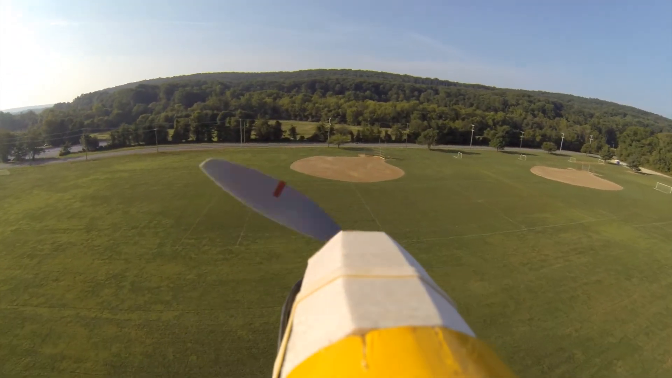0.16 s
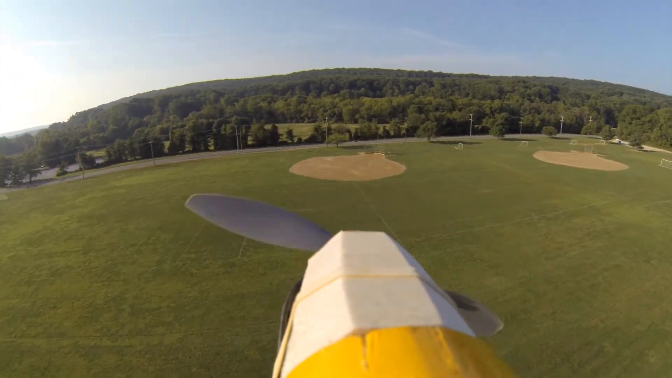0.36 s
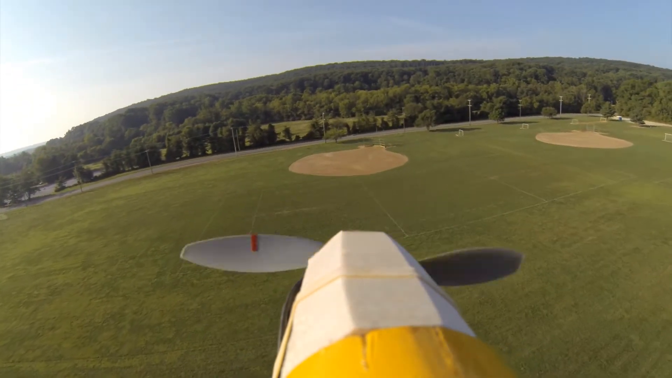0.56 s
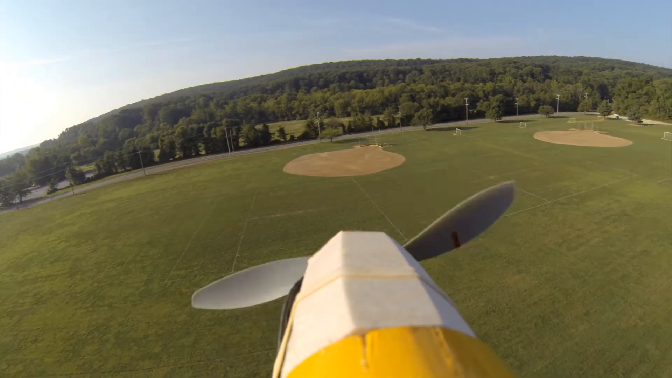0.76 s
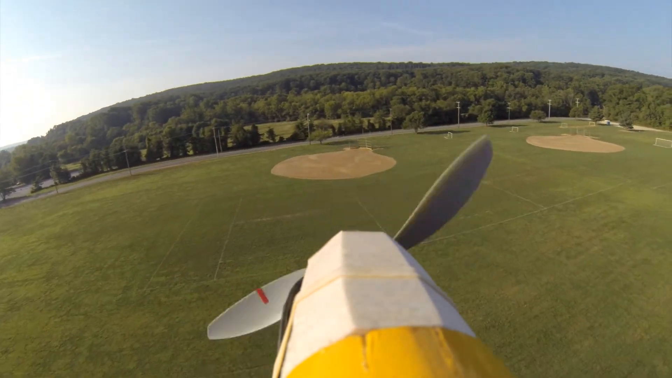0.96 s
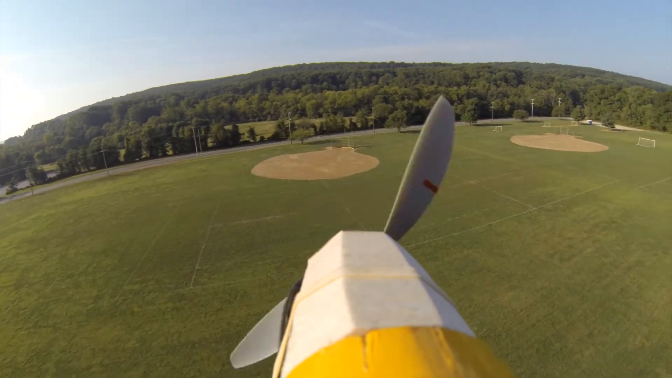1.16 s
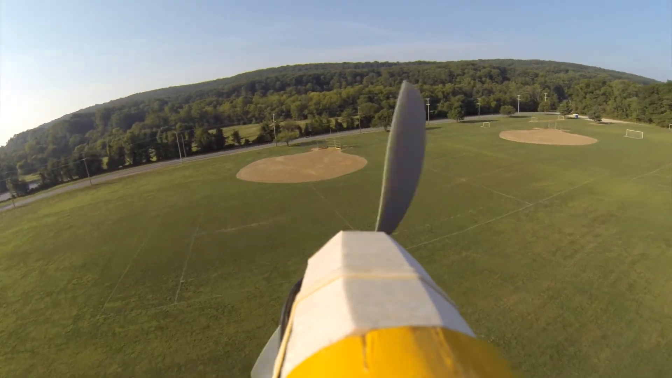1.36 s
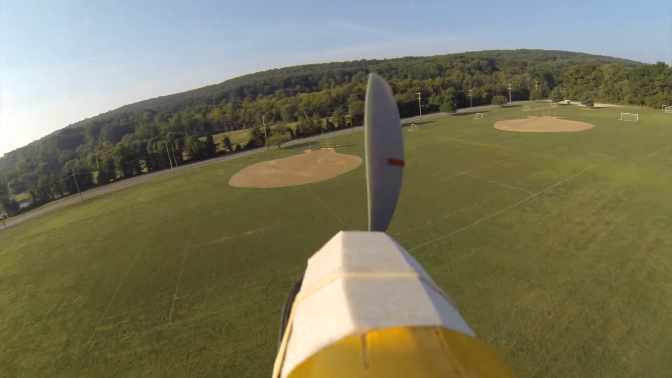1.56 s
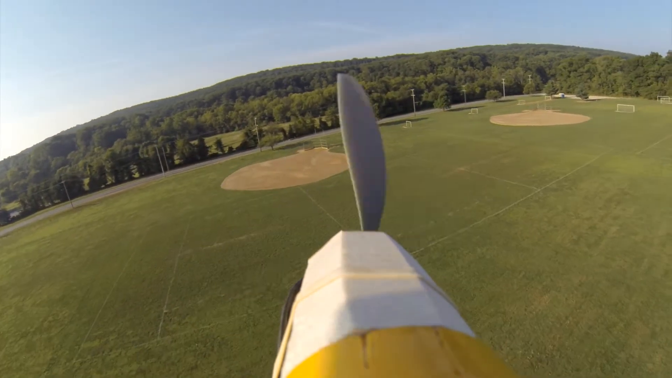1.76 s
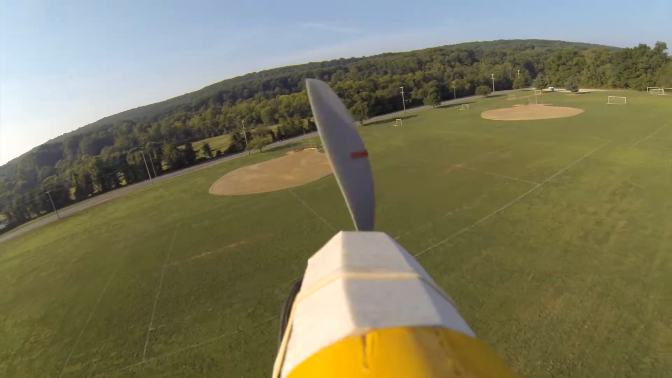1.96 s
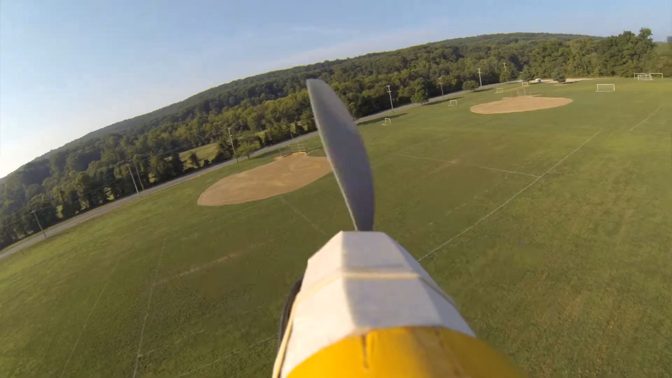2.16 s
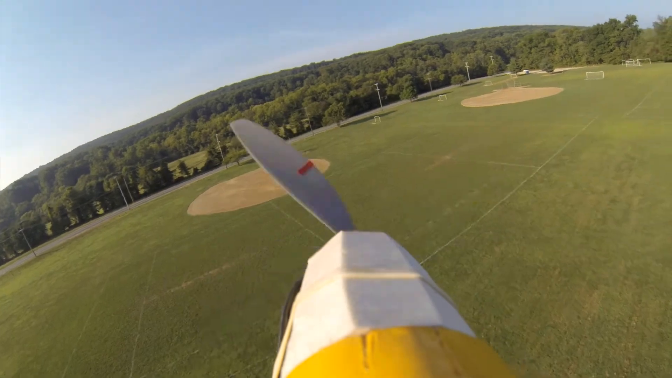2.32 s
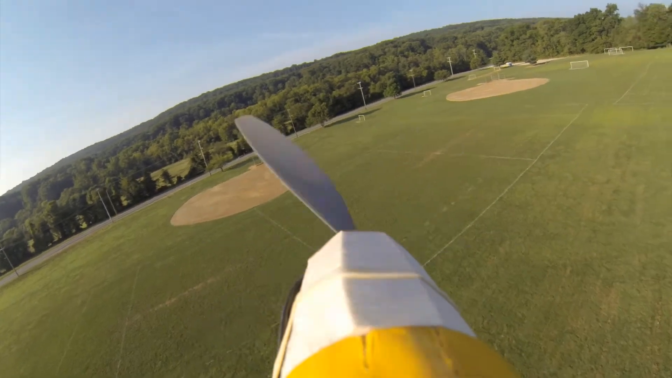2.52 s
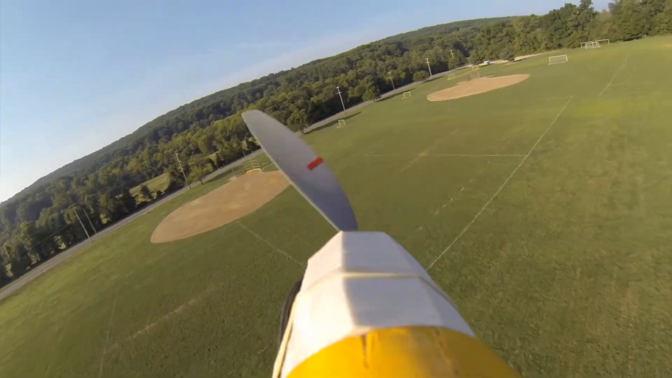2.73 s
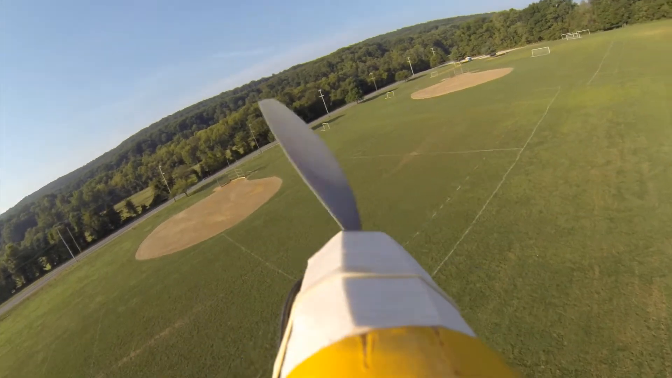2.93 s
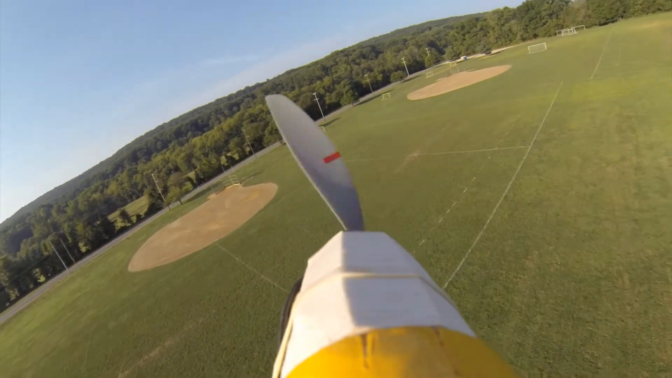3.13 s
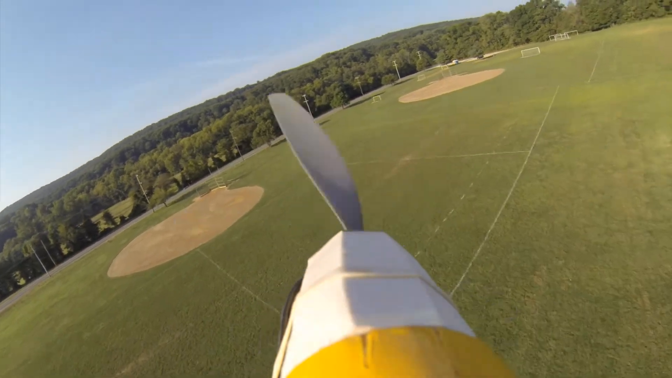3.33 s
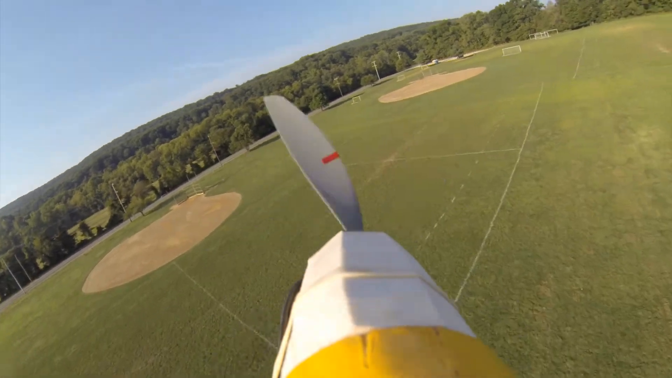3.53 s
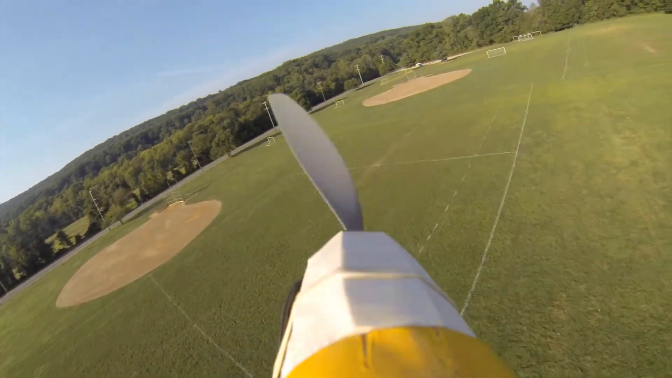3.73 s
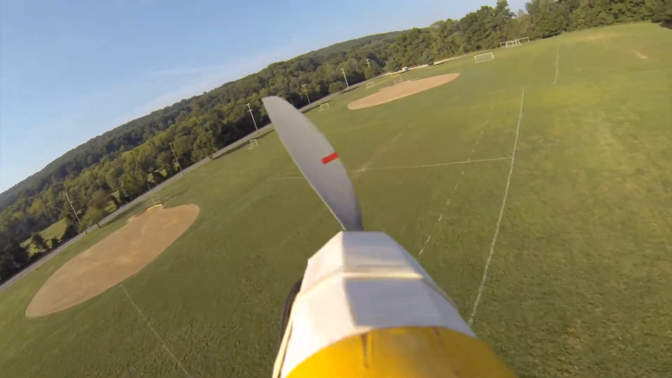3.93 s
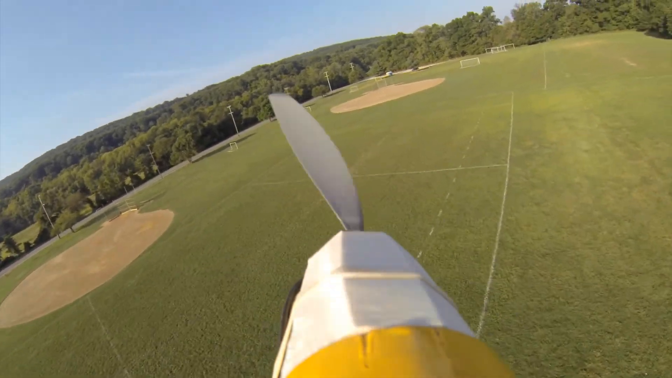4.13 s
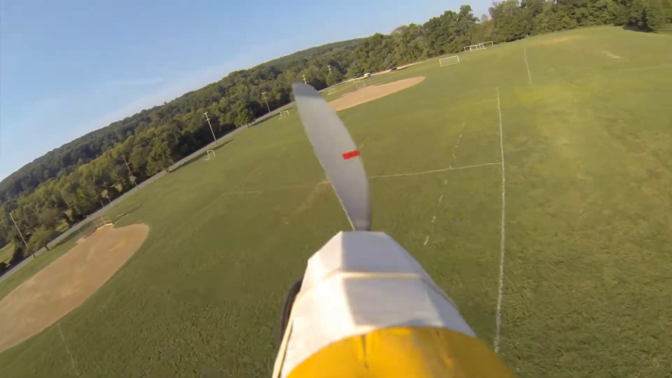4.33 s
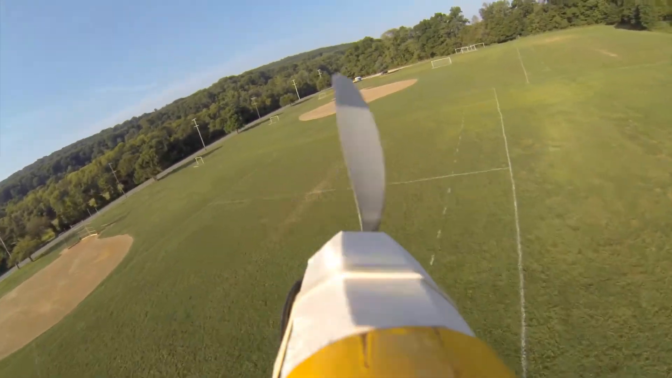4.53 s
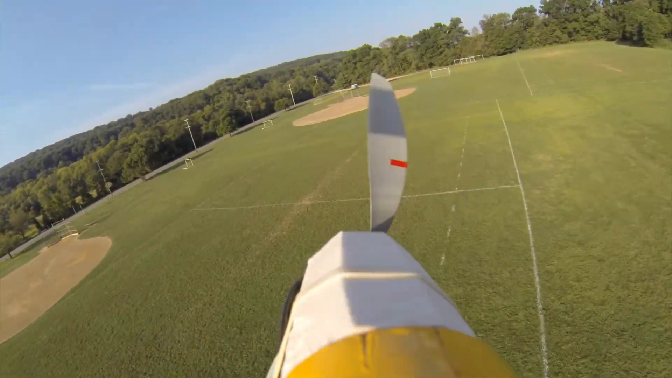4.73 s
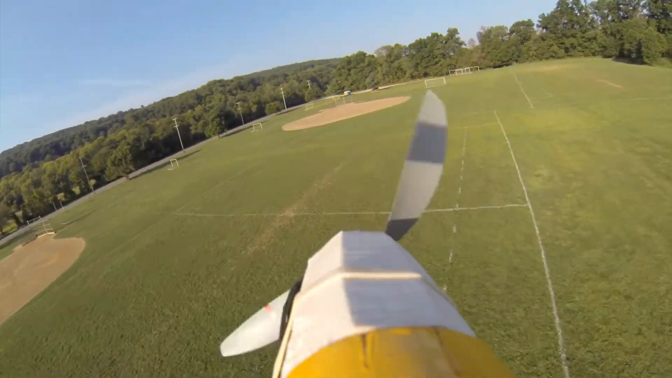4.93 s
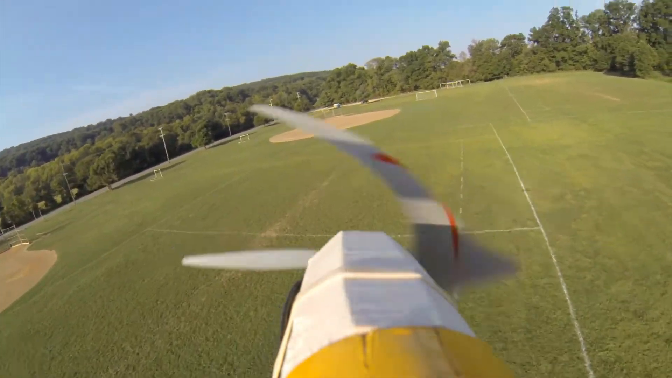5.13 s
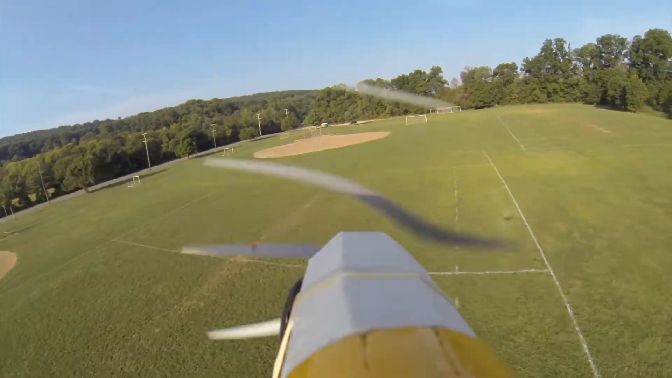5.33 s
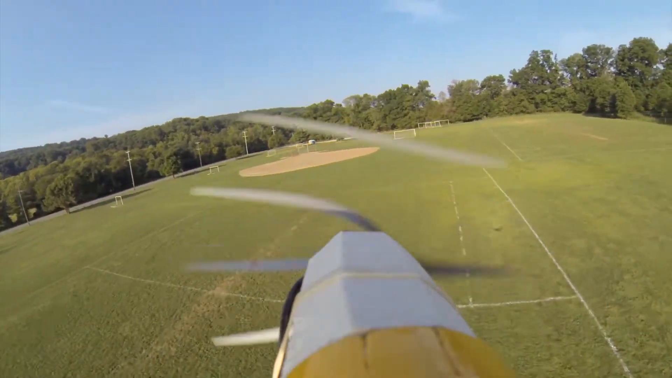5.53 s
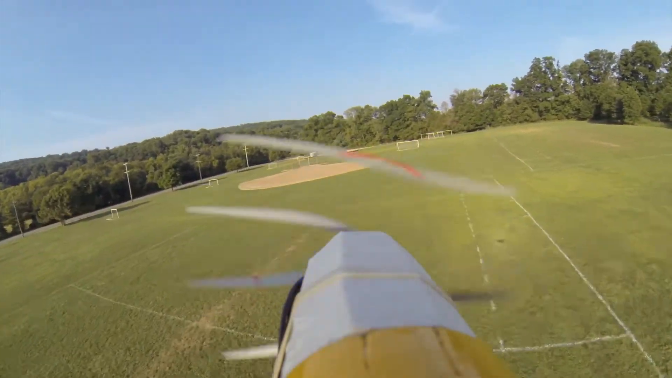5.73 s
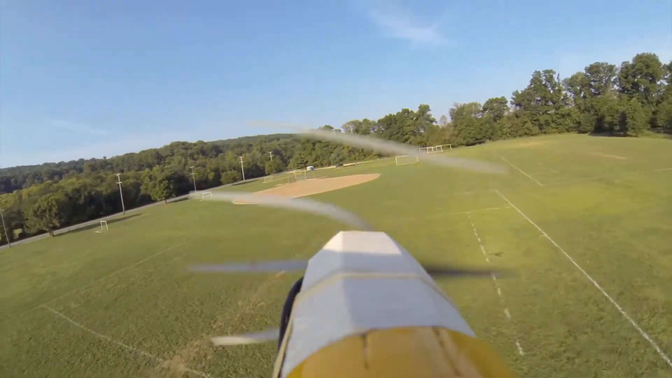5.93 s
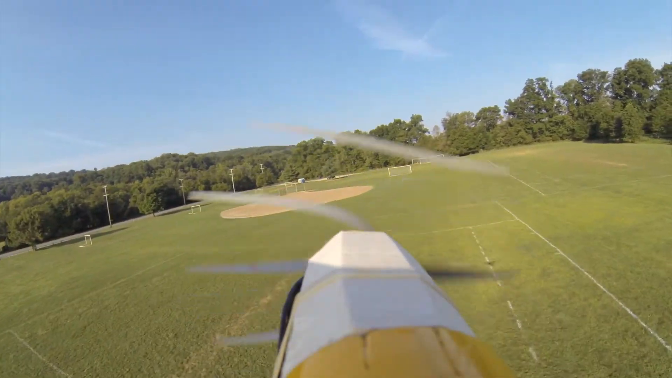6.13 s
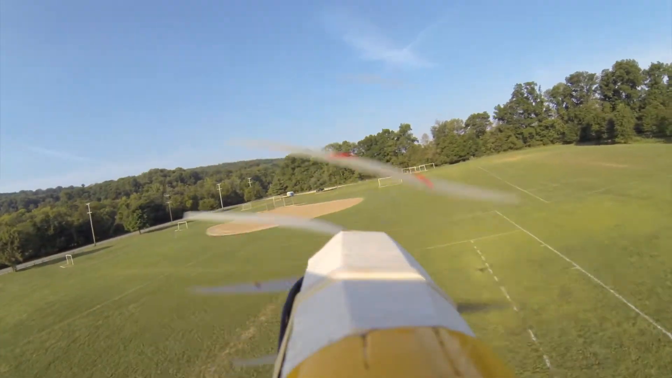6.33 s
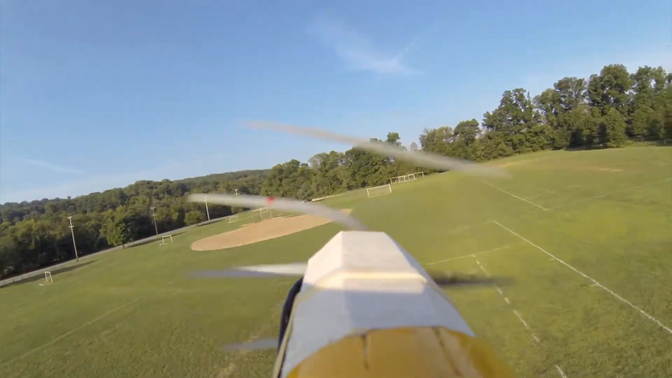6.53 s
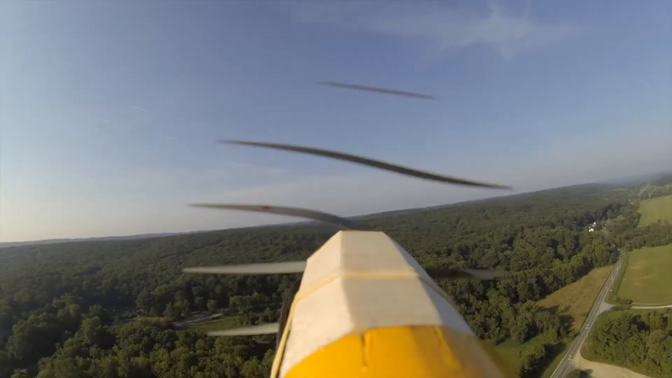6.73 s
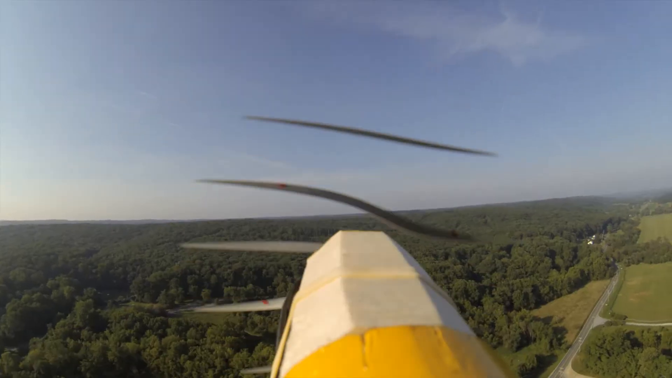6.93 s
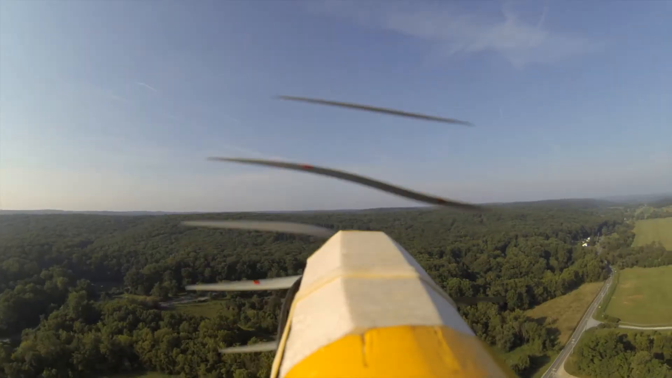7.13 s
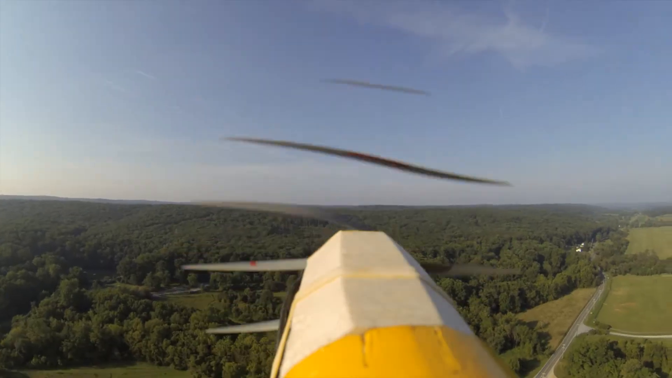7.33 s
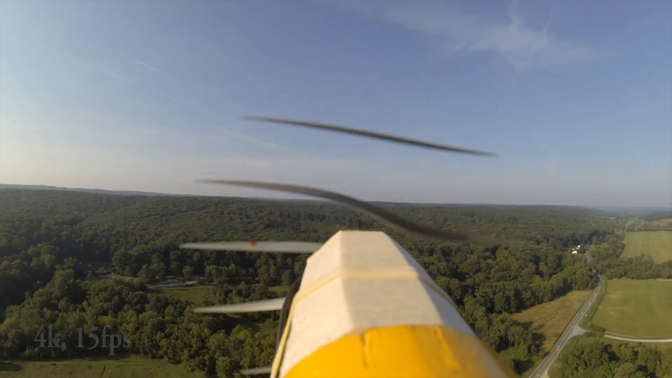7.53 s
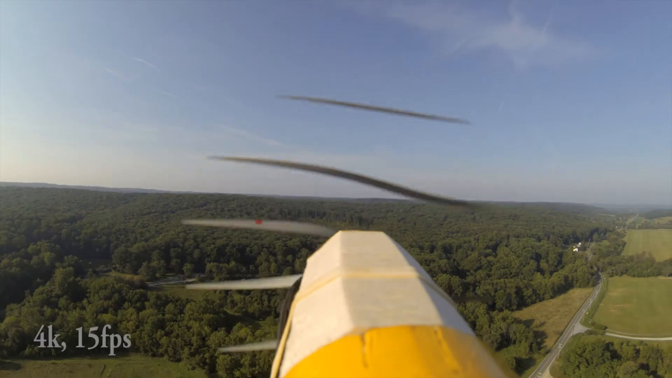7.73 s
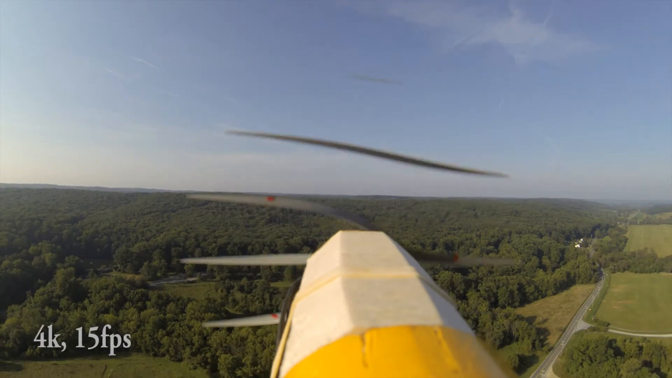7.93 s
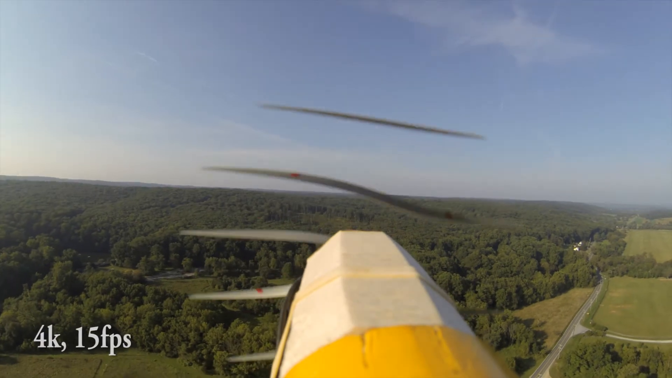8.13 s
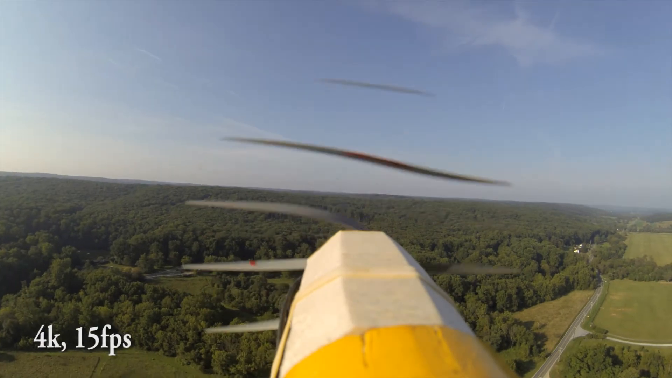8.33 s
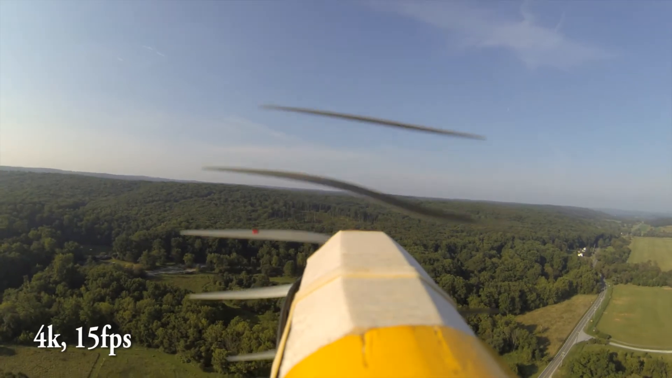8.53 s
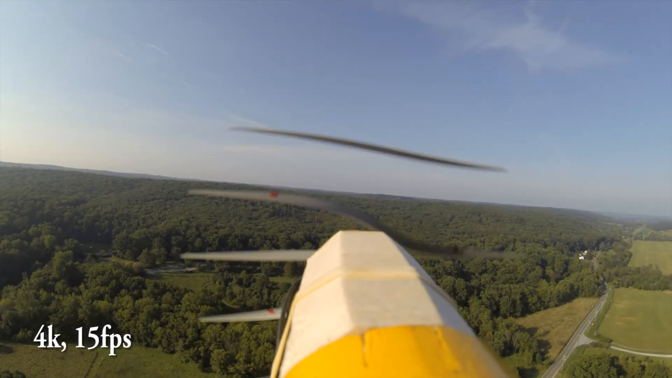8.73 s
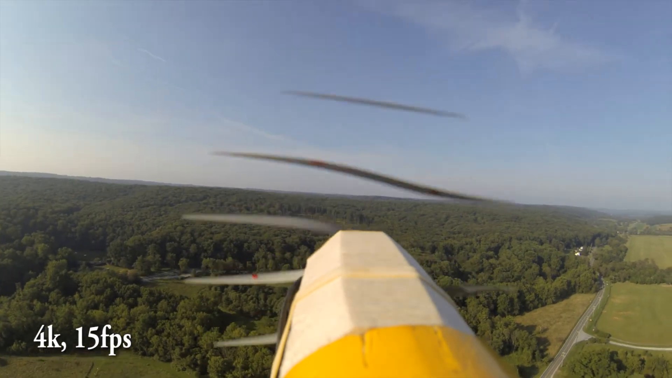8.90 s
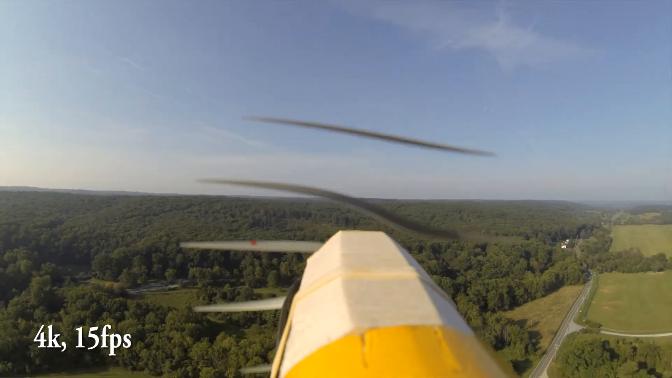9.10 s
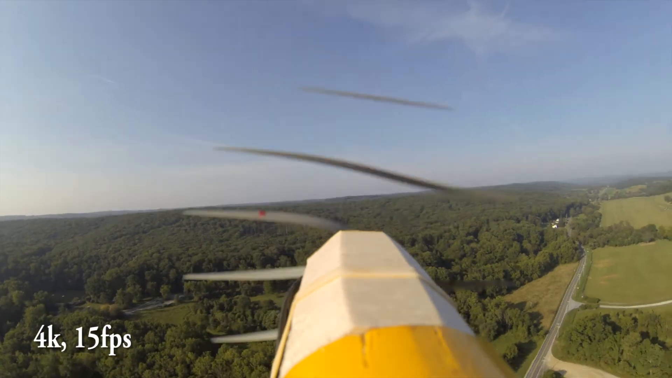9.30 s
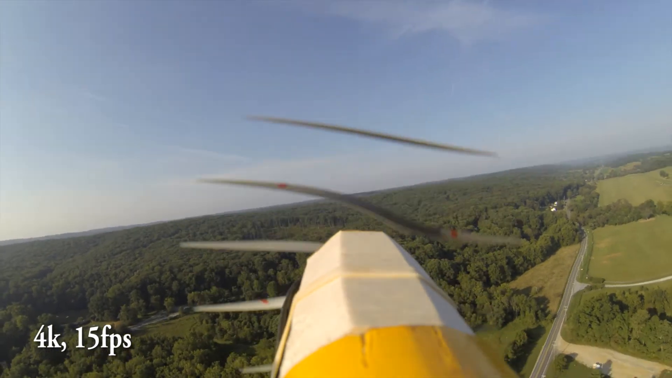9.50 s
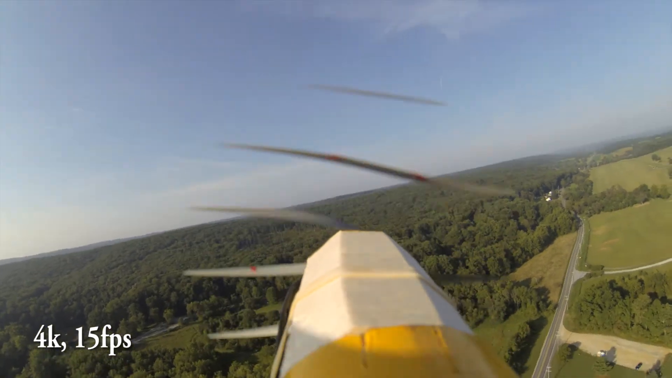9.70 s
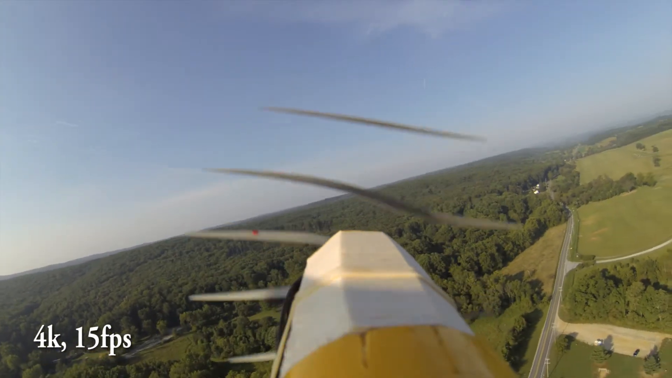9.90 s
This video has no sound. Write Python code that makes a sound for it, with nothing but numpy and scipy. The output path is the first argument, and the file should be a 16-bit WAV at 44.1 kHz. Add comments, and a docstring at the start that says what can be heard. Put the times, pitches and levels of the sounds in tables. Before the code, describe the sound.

Close, rhythmic slaps of air come from the idling propeller of a gliding model plane, heard from its nose in open air with a low wind rumble. After about five seconds the electric motor starts, its whine climbing quickly as the flutter becomes a continuous crackling wash. The pitch steps up a little and holds, with the blades droning underneath and a very faint high whistle above.

```python
"""Slow slaps of air, about five a second, on a microphone on the nose of a gliding electric model plane.
The propeller windmills close by, and the wake of each blade strikes as a thump and a crackle.
At 5 s the motor spins up with a whine, its speed controller whistles, and the slaps merge into a
steady, crackling wash. Near 6.6 s the climb crossfades to a faster cruise, where the blade tone
drones under the whine."""
import sys
import numpy as np
from scipy import signal
from scipy.fft import rfft, irfft
from scipy.io import wavfile
from scipy.ndimage import uniform_filter1d

SR = 44100
rng = np.random.default_rng(int(sys.argv[2]) if len(sys.argv) > 2 else 0)


def generate_wav(sig):
    """Save sig (samples, or channels by samples) to the path in sys.argv[1] as 16-bit PCM at SR."""
    pcm = np.round(np.clip(np.atleast_2d(sig).T, -1, 1) * 32767).astype(np.int16)
    wavfile.write(sys.argv[1], SR, pcm)


N = 439236
TIME = np.arange(N) / SR
MOTOR_START_S, BLADE_COUNT = 5.034, 2

# blade wakes reaching the microphone in the glide: start_s, strength_db, length_s
WAKES = [(0.093, -21.5, 0.059), (0.307, -29.5, 0.13), (0.54, -23.5, 0.049), (0.748, -25.5, 0.071),
         (0.988, -19, 0.031), (1.195, -31, 0.062), (1.393, -28, 0.068), (1.605, -26, 0.12),
         (1.818, -32.5, 0.05), (2.03, -23.5, 0.063), (2.219, -24, 0.063), (2.43, -23.5, 0.075),
         (2.628, -23.5, 0.057), (2.823, -26, 0.08), (3.018, -25.5, 0.082), (3.23, -24, 0.059),
         (3.438, -18.5, 0.04), (3.626, -25, 0.061), (3.829, -26, 0.049), (4.035, -23, 0.05),
         (4.221, -26, 0.059), (4.412, -21, 0.061), (4.609, -24, 0.054), (4.798, -20.5, 0.064),
         (4.988, -20, 0.037), (5.1, -28, 0.017)]
# spectrum of air tearing across the microphone in the glide: frequency_hz, relative_db
CRACKLE_SPECTRUM = [(50, -10.5), (150, -1), (300, 2), (600, -3), (1200, -10), (2300, -18), (3300, -26.5),
                    (4500, -37), (6000, -47.5), (8500, -59), (14000, -76)]


def wake_slaps(thump_lead_s=0.0045, thump_stretch=1.24, thump_growth=0.36):
    """Each blade's wake arrives as a low thump with a sharp crackle on its crests, and trails off."""
    # spectrum of a wake's pressure swing: frequency_hz, relative_db
    thump_spectrum = [(8, -36.5), (25, -4.5), (70, 2), (130, -1.5), (220, -8.5), (400, -19), (900, -31.5),
                      (4500, -100)]
    crackle, thump = np.zeros((2, N))
    for start_s, strength_db, length_s in WAKES:
        near = slice(max(int((start_s - .05) * SR), 0), int((start_s + .25) * SR))
        age = TIME[near] - start_s
        crackle[near] += gain_of(strength_db) * swell(age, length_s, rise_s=0.0017)
        # the thump comes first, lasts longer and varies less from wake to wake
        thump_shape = swell(age + thump_lead_s, length_s * thump_stretch, rise_s=0.0019)
        thump[near] += gain_of(thump_growth * strength_db) * thump_shape
    swing = buffet(thump_spectrum, steady_hz=29.8)
    tearing = turbulence(CRACKLE_SPECTRUM, gust_db=3.0, gust_hz=220,
                         eddies_per_s=750, eddy_share=0.74, steady_hz=45)
    return gain_of(-3.5) * crackle * tearing * crests(swing, depth_db=4.5) + gain_of(-10) * thump * swing


def wake_snaps(peak_s=0.0034, size=900):
    """Steep edges within a wake crack for a few milliseconds."""
    # bright cracks where a wake tears across the microphone: start_s, strength_db
    cracks = [(.094, -25), (.132, -27), (.308, -24), (.543, -34), (.747, -28), (0.78, -23.5), (.988, -16),
              (1.191, -21), (1.398, -22.5), (1.623, -26), (1.821, -16.5), (2.035, -27), (2.428, -21),
              (2.624, -22), (2.821, -19), (2.834, -26), (3.223, -23), (3.237, -21.5), (3.629, -22.5),
              (3.83, -17.5), (4.06, -24), (4.231, -16), (4.431, -21), (4.445, -19.5), (4.611, -15),
              (4.629, -19), (4.807, -17.5), (4.822, -19), (4.986, -17.5), (5.008, -25), (5.099, -31)]
    # spectrum of a wake's edge: frequency_hz, relative_db
    edge_spectrum = [(50, -12), (250, 3.5), (900, -9), (2400, -11.5), (4000, -19.5), (6000, -34.5),
                     (10000, -50.5), (14000, -70)]
    age = np.arange(size) / (peak_s * SR)
    envelope = (age * np.exp(1 - age)) ** 3
    bursts = np.zeros(N)
    for start_s, strength_db in cracks:
        bursts[int(start_s * SR):][:size] += gain_of(strength_db) * rng.standard_normal(size) * envelope
    return gain_of(-6) * colour(bursts, edge_spectrum)


def eddy_pops(reach=1500):
    """A hard eddy hits the microphone port: a pressure spike with a shallow suction on either side."""
    # single eddies, wide ones as thuds, narrow ones as ticks: time_s, peak_db, half_width_s
    eddies = [(.117, -13, .00036), (.1352, -13, .00032), (.3103, -8, .0019), (.557, -11, .0016),
              (.7995, -11, .0005), (1.0265, -9, .0008), (1.1943, -9, .0026), (1.392, -15, .00038),
              (1.4028, -11, .0009), (1.6548, -14, .00041), (1.8248, -8, .003), (2.4321, -9.5, .00028),
              (2.6267, -10, .00038), (2.6525, -4.5, .0015), (2.8369, -8, .00022), (3.2397, -16, .00052),
              (3.4556, -13.5, .00046), (3.6354, -6, .00054), (3.659, -10, .0006), (3.833, -12.5, .00051),
              (4.614, -12, .00045), (4.65, -16, .00046), (4.8573, -8.5, .00044), (4.9905, -9.5, .00079),
              (5.0106, -7.5, .00064), (6.04, -11, .0005), (6.4475, -9.5, .0004), (7.059, -12, .0003),
              (7.441, -11.5, .0004), (7.477, -11.5, .0005), (7.3088, -10, .000115), (7.805, -9.5, .00024),
              (8.4563, -9, .00026), (8.606, -10, .00023), (8.7595, -10.5, .00028), (8.8135, -10.5, .0003),
              (9.0144, -9.5, .00034), (9.0816, -9.5, .000145), (9.3858, -9, .00036), (9.3918, -17, .00013),
              (9.411, -10, .00042), (9.4667, -10.5, .00018)]
    pressure = np.zeros(N)
    for time_s, peak_db, half_width_s in eddies:
        offset = np.arange(-reach, reach) / (half_width_s * SR)
        spike = np.hanning(2 * reach) * (1 - offset ** 2) / (1 + offset ** 2) ** 2
        pressure[int(time_s * SR) - reach:][:2 * reach] += gain_of(peak_db) * spike
    return pressure


def airflow(blade_turns, load, slow_pulsing=0.58, loaded_pulsing=0.073):
    """Light wind in the glide, then the propeller's sputtering wash, pulsing most with slow blades."""
    # air on the microphone between the wakes in the glide: time_s, rumble_trend_db, rush_trend_db
    glide_levels = [(0, -30.5, -39.5), (2.3, -31, -35), (4.1, -28, -37.5), (5.05, -37, -37.5)]
    # air on the microphone under power: time_s, rumble_trend_db, rush_trend_db
    wash_levels = [(5.1, -31, -29.5), (5.36, -31.5, -39), (5.5, -24, -30.5), (6.1, -22.5, -30),
                   (6.55, -27, -31), (6.9, -26.5, -29.5), (8.6, -28, -28.5), (8.85, -28.5, -26.5),
                   (9.35, -29.5, -24.5), (9.96, -28.5, -29)]
    # spectrum of the wind's low buffeting: frequency_hz, relative_db
    rumble_spectrum = [(8, -38.5), (20, -2.5), (40, 0.5), (70, 4), (130, -2.5), (220, -10), (450, -24.5),
                       (3000, -100)]
    # spectrum of the propeller's wash: frequency_hz, relative_db
    wash_spectrum = [(50, -9), (150, 3.5), (300, 0.5), (600, -3.5), (1500, -12), (2400, -16.5),
                     (3000, -22.5), (4000, -31), (5000, -43), (7000, -58), (9000, -64), (14000, -77)]
    rumble_db, rush_db = curves(list(glide_levels) + list(wash_levels))
    swing = buffet(rumble_spectrum, steady_hz=6.6)
    rumble = gain_of(rumble_db + 1.35) * lulls(delay_s=.125, half_length_s=.03, depth_db=-5) * swing
    wind = turbulence(CRACKLE_SPECTRUM, gust_db=2.5, gust_hz=90,
                      eddies_per_s=1500, eddy_share=0.55, steady_hz=12)
    wind *= gain_of(-0.4) * lulls(delay_s=0.099, half_length_s=0.031, depth_db=-3.5)
    wash = turbulence(wash_spectrum, gust_db=1.36, gust_hz=100,
                      eddies_per_s=700, eddy_share=0.53, steady_hz=12, largest=1.8)
    wash *= gain_of(3.5) * crests(swing, depth_db=1.26)
    powered = ramp(TIME, [5.1, 5.45])
    rush = np.sqrt(1 - powered) * wind + np.sqrt(powered) * wash
    depth = ramp(TIME, [MOTOR_START_S, 5.1]) * np.interp(load, [0, 1], [slow_pulsing, loaded_pulsing])
    pulsing = 1 + depth * np.cos(2 * np.pi * blade_turns)
    surges = gain_of(1.1 * wander(14))
    return rumble + gain_of(rush_db) * surges * pulsing * rush


def climb(speed, turns, load):
    """The blades beat, the whine sets in, then load softens the beat and brings up whistle and hiss."""
    # the motor's further tones in the climb: shaft_multiple, level_re_whine_db
    overtones = [(25, -14), (36, -11), (96, -31), (144, -46)]
    # the whine in the climb, before the motor's modes boost it: time_s, level_db
    whine_levels = [(5.5, -41), (6.4, -38.5)]
    idle = 1 - load
    # each sound sets in over its own range of shaft speed, in turns per second
    beat_on, whine_on = ramp(speed, [4, 12]), ramp(speed, [27, 33])
    overtones_on, whistle_on = ramp(speed, [44, 68]), ramp(speed, [0, 1])
    beat_db, whistle_db = -23.5 * idle - 48 * load, -68.5 * idle - 57 * load
    beat = gain_of(beat_db) * blade_tone(turns, peaked=np.interp(speed, [18, 60], [.6, .22]))
    whine = motor_whine(speed, turns, overtones, overtones_on, waver_db=1 + .8 * idle)
    whine *= gain_of(curves(whine_levels)[0])
    whistle = gain_of(whistle_db) * controller_whistle(turns, lift_db=4 * idle, waver_db=4 + 1.5 * idle)
    return beat_on * beat + whine_on * whine + whistle_on * whistle + load * blade_hiss()


def cruise(speed, turns):
    """A level whine, a faint whistle and a thin hiss over the drone of the blades."""
    # the motor's further tones at cruise: shaft_multiple, level_re_whine_db
    overtones = [(24, -16), (25, -19), (35, -20), (75, -38), (96, -42), (123, -45), (144, -47), (147, -52)]
    # the blades' drone at cruise: time_s, level_db
    drone_levels = [(6.9, -23.5), (8.2, -26), (8.85, -27), (9.05, -32), (9.5, -48), (9.65, -27.5),
                    (9.96, -25)]
    whine = gain_of(-40.5) * motor_whine(speed, turns, overtones, overtones_on=1, waver_db=0.8)
    drone = gain_of(curves(drone_levels)[0]) * blade_tone(turns, peaked=.1)
    whistle = gain_of(-66.5) * controller_whistle(turns, lift_db=0, waver_db=4.5)
    return whine + drone + whistle + gain_of(-4) * blade_hiss()


def motor_whine(speed, turns, overtones, overtones_on, waver_db, order=48):
    """Magnets passing the coils sing at one high shaft order; load adds others, each swelling alone."""
    further = 0
    for multiple, level_db in overtones:
        strength = gain_of(level_db + .7 * wander(6)) * housing(multiple * speed)
        further += strength * tone(multiple * turns + rng.random())
    whine = housing(order * speed) * tone(order * turns) * gain_of(waver_db * wander(25))
    return whine + overtones_on * further * gain_of(1.8 * wander(60))


def housing(pitch_hz):
    """A tone swells as it sweeps through each of the motor's ringing modes."""
    # the motor's ringing modes: mode_hz, half_width_hz, boost_db
    modes = [(1700, 82, 6), (2260, 100, 14)]
    return 1 + sum((gain_of(boost_db) - 1) / (1 + ((pitch_hz - mode_hz) / half_width_hz) ** 2)
                   for mode_hz, half_width_hz, boost_db in modes)


def spin_up(turns_per_s2=157.7, knee=8.8):
    """The shaft gains speed at a steady rate, then eases into the speed that the throttle allows."""
    # the throttle's limit in the climb: time_s, speed_turns_per_s
    throttle = [(5.55, 68.4), (5.87, 70.75), (6.35, 69.1), (6.55, 67.65)]
    limit = curves(throttle)[0]
    free = turns_per_s2 * np.maximum(TIME - MOTOR_START_S, 0)
    return free / (1 + (free / limit) ** knee) ** (1 / knee)


def shaft_turns(speed, flutter):
    """The turns made by a slightly unsteady shaft."""
    return np.cumsum(speed * (1 + flutter * wander(22))) / SR


def blade_tone(turns, peaked):
    """One pressure pulse a blade: peaked while slow, a round drone at speed."""
    pulse = sum(peaked ** k * tone((k + 1) * BLADE_COUNT * turns) for k in range(4))
    return gain_of(0.88 * wander(33)) * pulse


def controller_whistle(turns, lift_db, waver_db, switch_hz=8005):
    """The speed controller whistles at its switching rate; fluttering sidebands follow the shaft."""
    # the switching tone and its sidebands: offset_shaft_multiple, relative_db
    bands = [(-48, -25), (-24, -21), (-2, -20), (0, 0), (2, -20), (24, -28), (48, -24)]
    whistle = 0
    for offset, relative_db in bands:
        sideband_db = (offset != 0) * (lift_db + waver_db * wander(26))
        whistle += gain_of(relative_db + sideband_db) * tone(switch_hz * TIME + offset * turns)
    return whistle


def blade_hiss():
    """The hard-working blades add a thin hiss as they bite the air."""
    # spectrum of the hiss: frequency_hz, relative_db
    hiss_spectrum = [(2000, -21), (5000, -3.5), (9000, -19.5), (14000, -57)]
    return gain_of(-64) * colour(rng.standard_normal(N), hiss_spectrum)


def turbulence(spectrum, gust_db, gust_hz, eddies_per_s, eddy_share, steady_hz, largest=3):
    """Air that comes in quick gusts, with single eddies striking as one-sided pressure spikes."""
    gusts = gain_of(gust_db * np.clip(wander(gust_hz), -2, 2))
    sizes = np.minimum(rng.exponential(1, N), largest)
    eddies = sizes * (rng.random(N) < eddies_per_s / SR)
    smooth = np.sqrt(1 - eddy_share) * rng.standard_normal(N)
    spiky = np.sqrt(eddy_share) * unit_rms(eddies - eddies.mean())
    return colour(steadied(gusts * (smooth + spiky), steady_hz), spectrum)


def buffet(spectrum, steady_hz):
    """Low pressure swings whose strength stays fairly even from swing to swing."""
    return steadied(signal.hilbert(colour(rng.standard_normal(N), spectrum)), steady_hz)


def crests(swing, depth_db):
    """Gain of the crackle: air tears on the crests of the low swings and runs smooth in the troughs."""
    return steadied(gain_of(depth_db * np.clip(swing, -1.8, 1.8)), hz=10)


def lulls(delay_s, half_length_s, depth_db):
    """Gain of the wind, which falls calm briefly behind each wake."""
    coarse_s = TIME[::64]
    calm = sum(np.exp(-np.minimum(abs(coarse_s - start_s - delay_s) / half_length_s, 10) ** 2)
               for start_s, _, _ in WAKES)
    return gain_of(depth_db * np.interp(TIME, coarse_s, calm))


def swell(age, length_s, rise_s):
    """An envelope with a rounded front at age 0, a hold, and a release around length_s."""
    front = .5 * (1 + np.tanh(age / (2 * rise_s)))
    return front * np.exp(-(np.maximum(age, 0) / length_s) ** 3)


def wander(hz):
    """A smooth random drift of rms 1 that rolls off above hz."""
    coarse_s = TIME[::16]
    count = len(coarse_s)
    rolloff = np.exp(-(np.fft.rfftfreq(count, coarse_s[1]) / hz) ** 2)
    drift = irfft(rfft(rng.standard_normal(count)) * rolloff, count)
    return np.interp(TIME, coarse_s, unit_rms(drift))


def colour(x, spectrum, size=8192):
    """A causal filter with the given spectrum, which keeps the power of white noise."""
    hz, db = np.transpose(spectrum)
    bin_hz = abs(np.fft.fftfreq(size, 1 / SR))
    gain = gain_of(np.interp(np.log(bin_hz + 1), np.log(hz), db))
    minimum_phase = np.exp(np.conj(signal.hilbert(np.log(gain))))
    taps = np.fft.ifft(minimum_phase).real[:size // 2]
    return signal.oaconvolve(x, taps / np.linalg.norm(taps))[:N]


def steadied(x, hz):
    """Evens out the strength of x over spans longer than 1 / hz."""
    power = abs(uniform_filter1d(abs(x) ** 2, int(SR / hz)))
    return unit_rms(x.real / np.sqrt(power + 1e-9))


def curves(rows):
    """Each column after a table's time_s, at every sample."""
    time_s, *columns = np.transpose(rows)
    return [np.interp(TIME, time_s, column) for column in columns]


def ramp(x, span):
    """Rises from 0 to 1 as x crosses the span."""
    return np.interp(x, span, [0, 1])


def tone(cycles):
    """A sine of rms 1."""
    return np.sqrt(2) * np.cos(2 * np.pi * cycles)


def gain_of(db):
    """Decibels to gain."""
    return 10 ** (np.asarray(db) / 20)


def unit_rms(x):
    """Scales to rms 1."""
    return x / np.sqrt(np.mean(x ** 2) + 1e-20)


def scene(crossfade_s=(6.55, 6.68), load_turns_per_s=(50, 64)):
    """The glide, the spin-up and the cruise, in mono from the plane's nose."""
    # the shaft at cruise: time_s, speed_turns_per_s
    cruise_speeds = [(6.6, 80.85), (7.5, 80.78), (8.1, 81.0), (8.55, 81.45), (9.25, 81.15), (9.96, 81.4)]
    climb_speed, cruise_speed = spin_up(), curves(cruise_speeds)[0]
    climb_turns = shaft_turns(climb_speed, flutter=0.00068)
    cruise_turns = shaft_turns(cruise_speed, flutter=.0004)
    load, cruising = ramp(climb_speed, load_turns_per_s), ramp(TIME, crossfade_s)
    drive = (1 - cruising) * climb(climb_speed, climb_turns, load)
    drive += np.sqrt(cruising) * cruise(cruise_speed, cruise_turns)
    air = airflow(BLADE_COUNT * np.where(cruising < .5, climb_turns, cruise_turns), load)
    return (wake_slaps() + wake_snaps() + air + eddy_pops() + drive)[None]


def record(dry):
    """The hardest slaps flatten against the recorder's ceiling; then the top treble is cut."""
    ceiling, cutoff_hz = .5, 13000
    clipped = dry / (1 + (dry / ceiling) ** 8) ** (1 / 8)
    lowpass = signal.firwin(511, cutoff_hz, window=("kaiser", 9), fs=SR)
    return signal.oaconvolve(clipped, lowpass[None], "same")


dry = scene()
out = record(dry)
generate_wav(out)
```